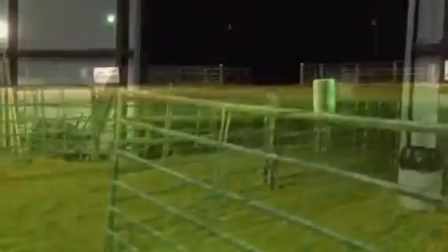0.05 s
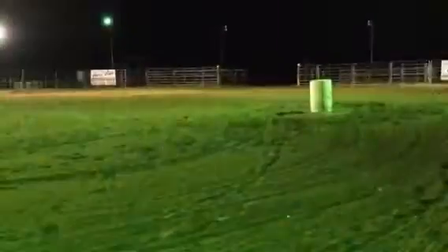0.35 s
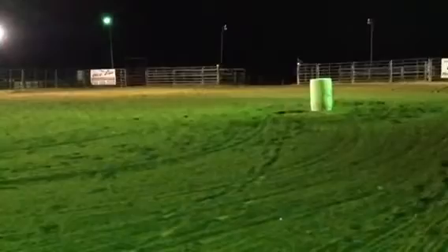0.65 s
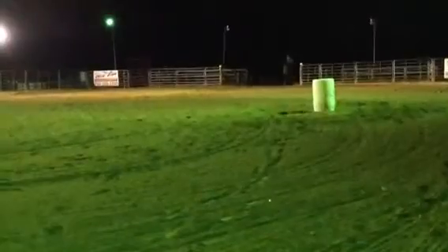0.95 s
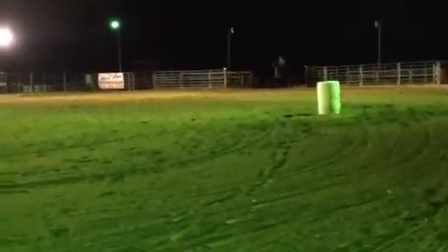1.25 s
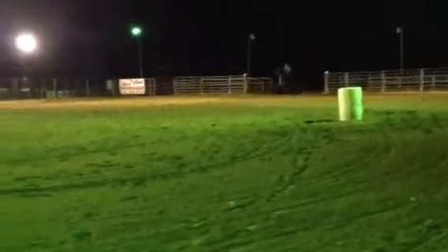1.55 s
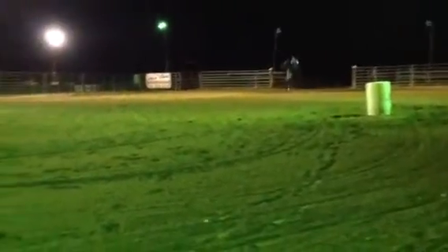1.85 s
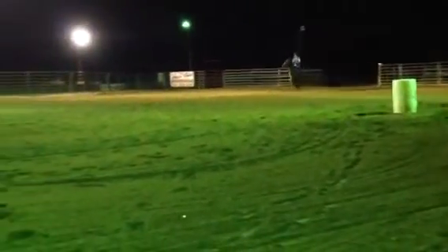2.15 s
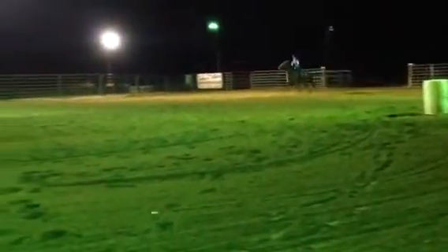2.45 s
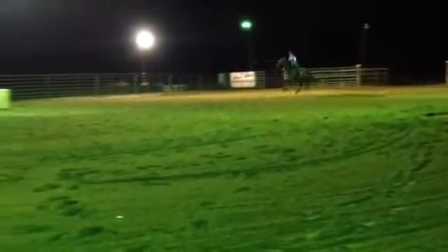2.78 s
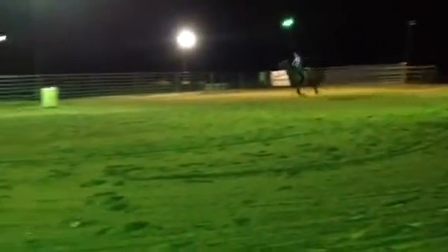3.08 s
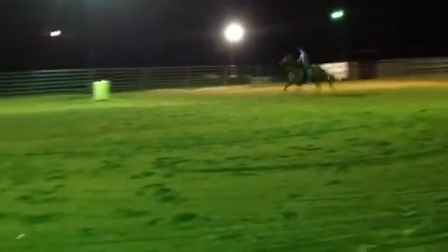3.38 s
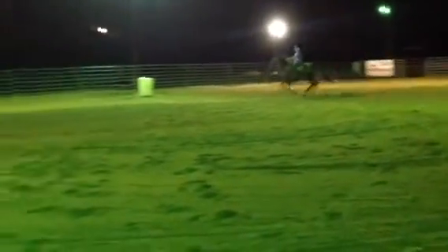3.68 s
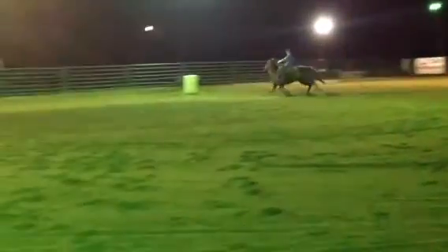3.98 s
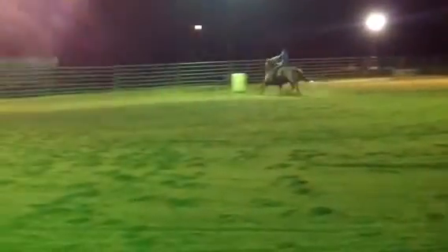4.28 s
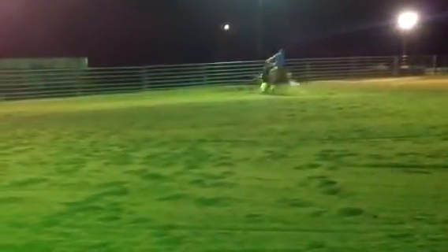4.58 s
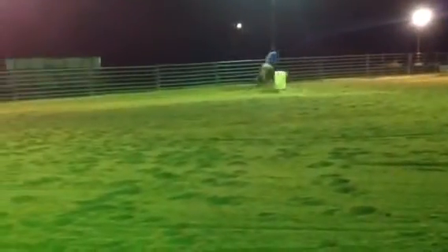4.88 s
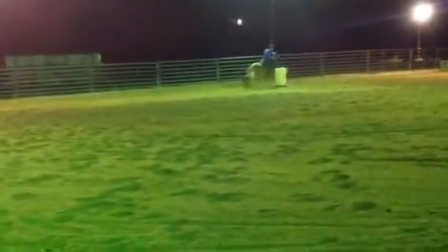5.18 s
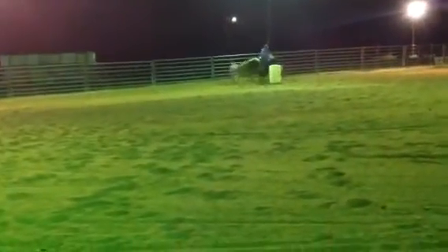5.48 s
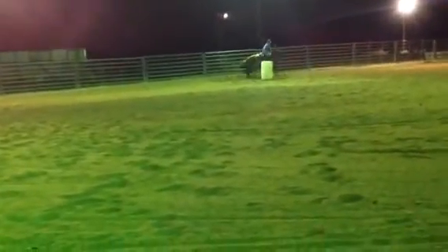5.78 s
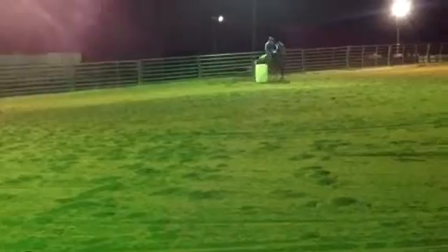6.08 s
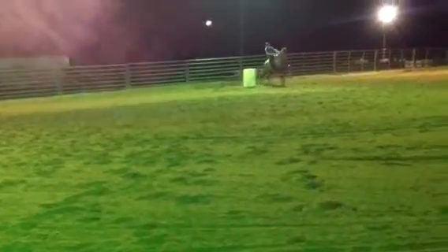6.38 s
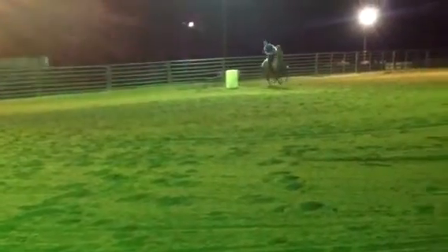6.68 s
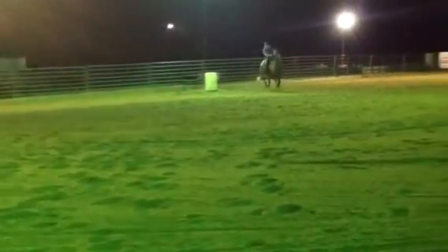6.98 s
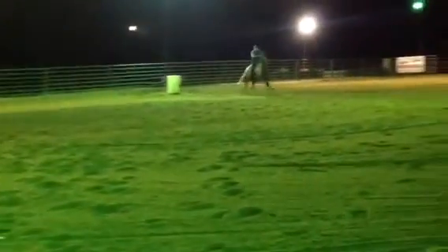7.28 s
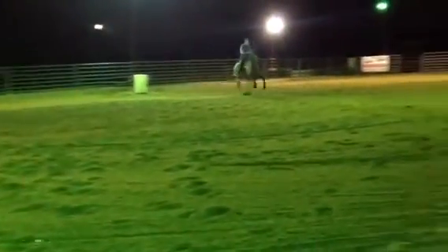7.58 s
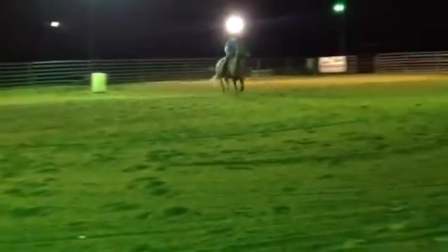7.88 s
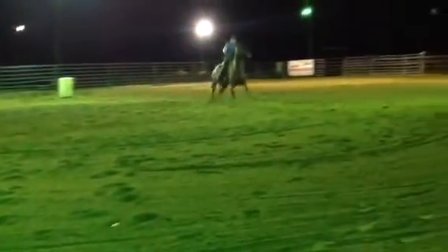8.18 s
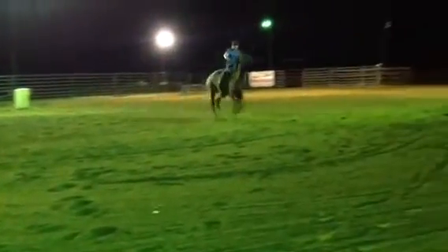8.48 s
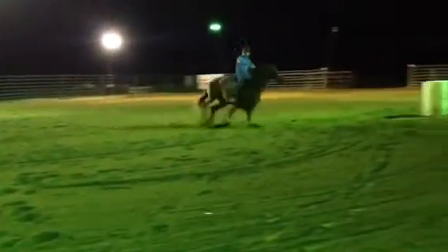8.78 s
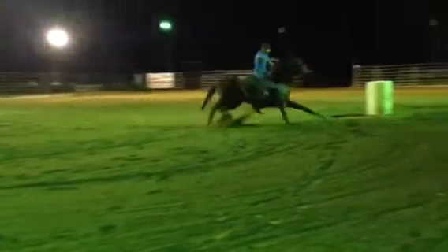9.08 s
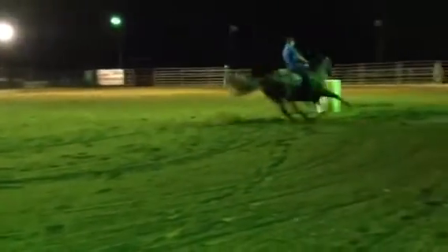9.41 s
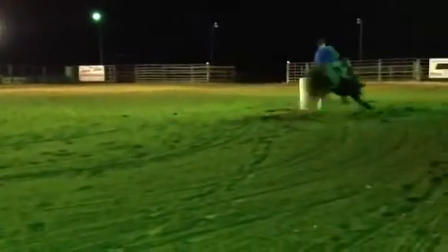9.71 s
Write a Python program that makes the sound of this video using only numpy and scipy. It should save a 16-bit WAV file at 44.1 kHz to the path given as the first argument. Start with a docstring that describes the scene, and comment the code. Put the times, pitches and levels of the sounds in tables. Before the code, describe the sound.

A horse gallops over soft dirt with thudding hooves, clinking tack and spraying sand, against a steady hiss of night insects.

```python
"""A horse gallops round a barrel on a dirt arena at night, heard from the rail.
Far insects hiss and nearer ones rasp their wings in turn; hooves thud, scuff and knock, dirt sprays.
At 1.4 s something hard clicks right beside the listener. From 2.2 s the metal of the tack clinks.
Near 6.2 s the horse treads softly round the barrel, then pounds out of the turn, flinging sand."""
import sys
import numpy as np
from scipy import signal
from scipy.fft import rfft, irfft
from scipy.io import wavfile
from scipy.ndimage import uniform_filter1d

SR = 44100
rng = np.random.default_rng(int(sys.argv[2]) if len(sys.argv) > 2 else 0)


def dump(signal):
    """Clip the signal to [-1, 1] and save it as 16-bit WAV at the path in sys.argv[1]."""
    limited = np.clip(np.atleast_2d(signal).T, -1, 1)
    pcm = np.round(limited * 32767).astype(np.int16)
    wavfile.write(sys.argv[1], SR, pcm)


N = 434385
T = np.arange(N) / SR

# hooves scraping through dirt: start_s, level_db, pitch_hz
HOOF_SCUFFS = [(.76, -43, 214), (2.974, -54, 398), (3.11, -55.5, 810), (4.015, -58, 900), (5.38, -55, 1000),
               (6.182, -53.5, 1190), (6.54, -55.5, 397), (6.669, -56, 1210), (6.935, -53, 1040),
               (7.135, -56.5, 1210), (7.372, -50.5, 1010), (7.805, -52, 890), (8.35, -54, 790),
               (8.725, -49, 970), (8.96, -53.5, 850), (9.089, -54.5, 900), (9.19, -49, 860),
               (9.421, -56, 890)]
# spectrum of crushed dirt: pitch_ratio, level_db
DIRT_COLOUR = [(.2, -12), (.35, -10), (.65, 5.5), (1, 6.5), (1.5, -1), (2.2, -4), (4.7, -10.5), (10, -43)]
# jolts of bit, chain and buckles: start_s, level_db, pitch_hz, relative_ring_db
TACK_CLINKS = [(2.233, -34, 8200, -20), (3.078, -25.5, 10400, -9), (3.435, -31, 8750, -2),
               (3.5405, -36, 9800, -10), (3.59, -27, 9170, 4), (3.688, -32, 10700, -14),
               (3.773, -31, 11700, -9), (4.061, -24, 9400, -9), (4.067, -30, 7300, -3),
               (4.082, -34, 10000, 0), (4.1565, -18.5, 11800, -19), (4.176, -28, 12500, 1),
               (4.19, -30, 13600, -2), (4.201, -32, 10200, -10), (4.5305, -34, 10400, -11),
               (4.881, -30, 12500, -17), (6.2643, -34, 11600, -9), (6.507, -27, 9700, -20),
               (6.6922, -23.5, 12800, -12), (7.021, -24.5, 12200, -20), (7.164, -30, 8850, 12),
               (7.522, -32, 11300, 0), (7.5224, -32, 6280, 5), (7.973, -33, 8970, -4),
               (8.09, -27.5, 11400, 2), (8.211, -24.5, 8940, -8), (8.213, -42, 13200, 4),
               (8.921, -26, 8900, 9), (8.927, -24, 8940, -2), (8.977, -26, 13000, -15),
               (9.071, -20.5, 11400, -25), (9.2175, -17, 11500, -18), (9.259, -23, 6500, -14),
               (9.2635, -28, 6940, -4), (9.34, -34, 8800, -20), (9.401, -21.5, 10700, -9),
               (9.431, -21, 9400, -9)]
# resonances of the tack: pitch_hz, level_db, t60_s
TACK_MODES = [(8850, -3, .06), (9900, -6, .05), (11270, -1, 0.059), (12460, 4, 0.044), (12970, -5, 0.05)]


def undb(db):
    """Decibels to gain."""
    return 10 ** (np.asarray(db) / 20)


def unit(x):
    """Scale to rms 1."""
    return x / np.sqrt(np.mean(x ** 2))


def unit_peak(x):
    """Scale to peak 1."""
    return x / np.abs(x).max()


def noise(size):
    """White noise."""
    return rng.standard_normal(size)


def add(out, start_s, x):
    """Mix x into out from start_s."""
    i = max(int(start_s * SR), 0)
    out[i:i + len(x)] += x[:N - i]


def highpass(x, hz):
    """Second-order low cut."""
    return signal.sosfilt(signal.butter(2, hz, "high", fs=SR, output="sos"), x)


def colour(x, points, pitch=1):
    """Filter by (frequency, dB) points, frequencies multiplied by pitch; rms 1."""
    hz, db = np.transpose(points)
    bins_hz = np.maximum(np.fft.rfftfreq(len(x), 1 / SR), 1)
    gain = undb(np.interp(np.log(bins_hz), np.log(hz * pitch), db))
    return unit(irfft(rfft(x) * gain, len(x)))


def band(x, hz, width_hz):
    """Steep resonance around hz; rms 1."""
    detune = (np.fft.rfftfreq(len(x), 1 / SR) - hz) / (width_hz / 2)
    return unit(irfft(rfft(x) / (1 + detune ** 4) ** .5, len(x)))


def walk(rate_hz):
    """Random held levels, smoothed twice; rms 1."""
    hold = int(SR / rate_hz)
    steps = np.repeat(noise(N // hold + 1), hold)
    return unit(uniform_filter1d(uniform_filter1d(steps, hold), hold)[:N])


def fade(t, t60_s):
    """Exponential decay, 60 dB in t60_s."""
    return np.exp(-np.log(1000) * t / max(t60_s, 1e-4))


def swell(t, peak_s, power):
    """Smooth rise to 1 at peak_s, then a longer fall."""
    u = t / max(peak_s, 1e-4)
    return (u * np.exp(1 - u)) ** power


def grains(size, per_s, spread_db):
    """Sparse impulses of uneven strength."""
    impulses = (rng.random(size) < per_s / SR) * noise(size)
    return impulses * undb(spread_db * rng.exponential(size=size).clip(0, 4))


def night():
    """Open air and a wavering chorus of far insects; both come up slightly at first."""
    # air spectrum: frequency_hz, level_db
    air_colour = [(18, -59), (30, -44), (95, -9), (160, 4.5), (290, -2), (415, -1.5), (988, -4), (1190, -8),
                  (1720, -9.5), (2290, 2), (2610, -4.5), (3870, -11.5), (4780, -4.5), (6720, -14.5),
                  (13700, -23.5), (14800, -21), (16000, -38)]
    # insect hiss: centre_hz, width_hz, level_db
    insect_bands = [(2355, 260, -64.5), (3160, 820, -57.5), (4840, 1570, -56.5)]
    # chorus contour: time_s, relative_db
    contour = [(0.0, -54), (1.15, -49), (2.14, -53), (2.6, -47.5), (3.68, -53), (4.77, -47.5),
               (5.21, -50.5), (9.85, -49)]
    air = undb(-53 + .4 * walk(7)) * colour(noise(N), air_colour)
    chorus = sum(undb(db + 1.14 * walk(8) + 1.2 * walk(30)) * band(noise(N), hz, width_hz)
                 for hz, width_hz, db in insect_bands)
    chorus *= unit(undb(np.interp(T, *np.transpose(contour))))
    return (air + chorus) * undb(np.interp(T, [0, .84], [-2, 0]))


def airborne_dirt(fling_db=-3, shake_db=-22):
    """Gain of the spray: a slow level that jumps after each scuff and each jolt of the tack."""
    # falling dirt, louder with the horse's speed and nearness: time_s, level_db
    contour = [(0.0, -71), (0.82, -64.5), (3.32, -61), (4.11, -51), (5.35, -58.5), (6.39, -55),
               (6.72, -63.5), (8.47, -54.5), (9.13, -47.5), (9.85, -53)]
    fling, shake, t = np.zeros(N), np.zeros(N), T[:SR // 2]
    for start_s, _, _ in HOOF_SCUFFS:
        add(fling, start_s, undb(fling_db) * swell(t, peak_s=.0074, power=.53))
    for start_s, db, _, _ in TACK_CLINKS:
        add(shake, start_s, undb(db + shake_db) * fade(t, t60_s=.071))
    slow_gain = undb(np.interp(T, *np.transpose(contour)))
    return np.hypot(slow_gain * (1 + fling), shake)


def spray(crackle_db=-2, jingle_db=-12):
    """Thrown sand falls in an uneven rush, crumbs tick in it and the tack stirs faintly."""
    # falling sand: frequency_hz, level_db
    sand_colour = [(1500, 1), (3500, -3), (6500, 0.5), (9000, 0), (13500, 2.5), (15500, -5)]
    flutter_db = 1.5 * walk(90) + 1.8 * walk(25) + 1.8 * walk(11)
    sand = undb(flutter_db) * colour(grains(N, per_s=8000, spread_db=1.3), sand_colour)
    landings, t = np.zeros(N), T[:SR // 8]
    gaps_s = rng.uniform(.003, .03, N // 100)
    landings[np.cumsum(gaps_s * SR).astype(int).clip(0, N - 1)] = 1
    crumb_envelope = signal.fftconvolve(landings * rng.random(N) ** 2, fade(t, t60_s=.0092))[:N]
    crackle = colour(crumb_envelope * noise(N), sand_colour)
    jingle = np.zeros(N)
    for hz, db, t60_s in TACK_MODES:
        ring = undb(db) * np.sin(2 * np.pi * hz * t) * fade(t, t60_s)
        jingle += signal.fftconvolve(grains(N, per_s=120, spread_db=3.6), ring)[:N]
    mix = sand + undb(crackle_db) * crackle + undb(jingle_db) * unit(jingle)
    return undb(-2.5) * airborne_dirt() * mix


def hoof(hz, peak_s=.0077, earth_db=-17, crumb_db=-24):
    """Soft soil takes a hoof gradually and swings unevenly; crumbs crush, loose earth settles."""
    t = T[:SR // 5]
    wobble_rad = .18 * band(noise(len(t)), hz / 2, width_hz=hz)
    load = swell(t, peak_s, power=4.8 * np.exp(rng.normal(0, .52)))
    blow = load * np.cos(2 * np.pi * hz * (t - peak_s) + rng.normal(0, .65) + wobble_rad)
    settling = fade(t, t60_s=.18) * np.minimum(t / peak_s, 1)
    earth = band(noise(len(t)), hz=270, width_hz=170) * settling
    crumbs = colour(grains(len(t), per_s=2500, spread_db=.8), DIRT_COLOUR, pitch=800)
    return blow + undb(earth_db) * earth + undb(crumb_db) * crumbs * swell(t, peak_s, power=1)


def patter(count=135, per_s=13, pitch_hz=209, turn_s=6.2, turn_sigma_s=.65, turn_db=-21):
    """Light footfalls, uneven in time, weight and pitch, softest in the turn."""
    out = np.zeros(N)
    for k, (late, weight, detune) in enumerate(noise((count, 3)).clip(-2, 2)):
        start_s = (k + .3 * late) / per_s % T[-1]
        in_turn = np.exp(-((start_s - turn_s) / turn_sigma_s) ** 2 / 2)
        db = -52 + 1.5 * weight + turn_db * in_turn
        add(out, start_s, undb(db) * hoof(pitch_hz * np.exp(.22 * detune)))
    return out


def chirp(length_s, hz, strokes_per_s=68, fall_hz=520, rasp_hz=1000):
    """A single call of rasping wings; each stroke slides down in pitch."""
    t = T[:int(length_s * SR)]
    stroke = (t * strokes_per_s + rng.random()) % 1
    pitch_hz = hz + fall_hz * (.5 - stroke) + rasp_hz * noise(len(t))
    gate = np.sin(np.pi * stroke) ** 2 * np.sin(np.pi * t / length_s) ** .5
    return unit(gate * np.sin(2 * np.pi * np.cumsum(pitch_hz) / SR))


def chirps(pitch_hz=7490, scatter_hz=90, faint_from_s=2.9, faint_db=-68, gap_s=.2):
    """Nearer insects rasp their wings in turn, carrying on more faintly later."""
    # near calls: start_s, level_db
    calls = [(.07, -62), (.48, -62), (.535, -62), (.83, -65), (1.145, -63), (1.235, -62), (1.475, -64),
             (1.83, -63.5), (2.36, -63), (2.49, -67), (2.68, -63)]
    out = np.zeros(N)
    for start_s, db in calls:
        add(out, start_s, undb(db) * chirp(length_s=.12, hz=rng.normal(pitch_hz, scatter_hz)))
    for slot_s in np.arange(faint_from_s, T[-1] - gap_s, gap_s):
        start_s = slot_s + .1 * rng.random()
        db = rng.normal(faint_db, 2)
        add(out, start_s, undb(db) * chirp(length_s=.09, hz=rng.normal(pitch_hz, scatter_hz)))
    return out


def ticks(sizzle_db=-17):
    """Grit strikes shoe or buckle: a short snap and a faint sizzle."""
    # grit on metal: start_s, peak_db, centre_hz
    strikes = [(0.254, -35, 11900), (2.945, -31, 12500), (2.979, -34, 12000), (3.1047, -34, 10000),
               (3.615, -32, 12100), (3.717, -31, 12800), (3.727, -31, 11000), (3.782, -29, 11500),
               (4.131, -31, 12800), (6.9501, -27.5, 12000), (7.1453, -26, 8000), (8.522, -29, 7640),
               (8.6562, -22.5, 6000), (8.949, -31, 8000), (9.0944, -32, 12400), (9.3418, -26, 7500),
               (9.427, -25, 9000), (9.432, -17.5, 8750), (9.6794, -27, 10100)]
    out, t = np.zeros(N), T[:SR // 25]
    envelope = fade(t, t60_s=.0025) + undb(sizzle_db) * fade(t, t60_s=.019)
    for start_s, db, hz in strikes:
        tick = band(noise(len(t)), hz, width_hz=7000) * envelope
        add(out, start_s, undb(db) * unit_peak(tick))
    return out


def thuds():
    """Heavy footfalls on soft soil."""
    # hoof landings: start_s, level_db, pitch_hz
    footfalls = [(0.665, -43, 222), (0.757, -45, 248), (0.782, -34, 244), (0.805, -38.5, 275),
                 (0.951, -40.5, 221), (1.144, -48, 226), (1.247, -36.5, 201), (1.534, -37, 211),
                 (1.588, -40, 226), (1.685, -43, 205), (1.992, -33.5, 187), (2.052, -38, 222),
                 (2.151, -41, 179), (2.381, -37, 208), (2.465, -39, 164), (3.01, -40, 196),
                 (3.423, -44, 202), (3.517, -39, 185), (3.7, -39.5, 259), (3.865, -46, 275),
                 (4.061, -43, 258), (4.155, -48, 240), (4.229, -43.5, 209), (4.322, -47, 195),
                 (4.611, -42, 250), (5.526, -40, 216), (7.142, -39.5, 215), (7.318, -32.5, 225),
                 (7.427, -38.5, 205), (7.656, -41.5, 173), (7.756, -40, 176), (7.851, -41, 242),
                 (8.051, -33.5, 202), (8.162, -34, 179), (8.2, -33.5, 182), (8.315, -40.5, 168),
                 (8.463, -45.5, 266), (8.618, -45, 199), (8.657, -38.5, 210), (8.976, -30.5, 222),
                 (9.007, -28.5, 173), (9.102, -39, 237), (9.411, -43.5, 286), (9.65, -30, 210)]
    out = np.zeros(N)
    for start_s, db, hz in footfalls:
        add(out, start_s, undb(db) * hoof(hz))
    return out


def scuffs(gain_db=1):
    """A sliding hoof crushes many crumbs of dirt in a short rush."""
    out, t = np.zeros(N), T[:SR // 4]
    for start_s, db, hz in HOOF_SCUFFS:
        crumbs = colour(grains(len(t), per_s=1800, spread_db=1.4), DIRT_COLOUR, hz)
        add(out, start_s, undb(db + gain_db) * swell(t, peak_s=.018, power=.48) * crumbs)
    return out


def knocks(gain_db=1):
    """Hoof on hoof or on a hard clod gives a woody tock; a breaking clod adds a dry crack."""
    # hard contacts: start_s, level_db, pitch_hz, relative_crack_db
    contacts = [(1.008, -39.5, 850, -15), (3.0155, -34, 680, -0.5), (3.521, -40, 517, -7),
                (4.06, -36.5, 850, -10), (4.162, -36, 1000, -5), (4.4795, -35, 850, -22),
                (4.488, -31, 880, -17), (4.812, -45, 750, -15), (5.047, -35, 530, -24),
                (7.147, -49.5, 1300, 11), (7.32, -41, 800, -15), (8.656, -37, 710, -10),
                (9.647, -36, 870, -16)]
    # tock spectrum: pitch_ratio, level_db
    tock_colour = [(.3, -23), (.55, -15), (.75, 5), (1.05, 10.5), (1.6, -4.5), (2.2, -20), (5, -26)]
    # crack spectrum: frequency_hz, level_db
    crack_colour = [(400, -11), (1500, 10), (2900, 4), (6000, -33)]
    out, t = np.zeros(N), T[:SR // 10]
    for start_s, db, hz, crack_db in contacts:
        tock = unit_peak(colour(noise(len(t)), tock_colour, hz) * fade(t, t60_s=.021))
        crack = unit_peak(colour(noise(len(t)), crack_colour) * fade(t, t60_s=.025))
        add(out, start_s, undb(db + gain_db) * (tock + undb(crack_db) * crack))
    return out


def click(start_s=1.3876, gain_db=-2.5, body_hz=275):
    """One hard tap close by: crack, knock, a low body that swings up late, rattle and rustle."""
    # resonances of the struck object: pitch_hz, level_db, t60_s
    modes = [(980, -4.5, 0.0075), (2740, -1, 0.0012), (4870, -7, 0.0013)]
    out, t = np.zeros(N), T[:SR // 2]
    crack = .53 * swell(t, peak_s=.00008, power=6.3)
    knock = sum(undb(db) * np.sin(2 * np.pi * hz * t) * fade(t, t60_s) for hz, db, t60_s in modes)
    body = undb(-24) * swell(t, peak_s=.0066, power=2.5) * np.sin(2 * np.pi * body_hz * t)
    grit = band(noise(len(t)), hz=6000, width_hz=8900)
    rattle = undb(-27) * fade(t, t60_s=.056) * grit
    rustle = undb(-47.5) * swell(t, peak_s=.049, power=1.9) * grit
    tap = highpass(crack + knock + rattle + rustle, hz=380)
    add(out, start_s, undb(gain_db) * (tap + body))
    return out


def clinks(gain_db=-1.5, width_hz=4600, rise_s=.00046, slide_s=.0012):
    """Links slide, then chatter, briefly if tight; a free one rings on and sets the tack ringing."""
    out, t = np.zeros(N), T[:SR // 6]
    before_s = T[:SR // 100][::-1]
    for start_s, db, hz, ring_db in TACK_CLINKS:
        chatter = band(noise(len(t)), hz, width_hz) * fade(t, t60_s=.017 * np.exp(ring_db / 30))
        roughness_rad = .12 * np.cumsum(noise(len(t)))
        link = np.sin(2 * np.pi * hz * t + roughness_rad)
        partials = sum(rng.random() * np.sin(2 * np.pi * rng.normal(mode_hz, 25) * t)
                       for mode_hz, _, _ in TACK_MODES)
        ring = (link + undb(-5) * partials) * fade(t, t60_s=.052)
        clink = unit_peak((chatter + undb(ring_db) * ring) * np.minimum(t / rise_s, 1))
        slide = undb(-20) * band(noise(len(before_s)), hz, width_hz) * np.exp(-before_s / slide_s)
        add(out, start_s - before_s[0], undb(db + gain_db) * np.concatenate([slide, clink]))
    return out


def kicks():
    """A hoof flings a fan of sand: a short scratchy rush of grains."""
    # fans of sand: start_s, level_db, rise_s, centre_hz
    fans = [(4.031, -35, 0.0025, 11000), (4.159, -36, 0.0023, 9350), (5.578, -38, 0.0057, 7140),
            (5.654, -40.5, 0.0017, 4450), (5.697, -48, 0.002, 4280), (5.986, -43.5, 0.0089, 9600),
            (6.975, -54, .004, 11000), (7.113, -52, .003, 10500), (8.856, -39, 0.0065, 8000),
            (8.951, -32.5, 0.002, 10000), (9.076, -46, .003, 11800), (9.263, -33, .002, 11500),
            (9.435, -40, 0.0029, 10500), (9.676, -45.5, 0.011, 11500)]
    out, t = np.zeros(N), T[:SR // 8]
    for start_s, db, rise_s, hz in fans:
        sand = highpass(grains(len(t), per_s=11000, spread_db=.53), hz=2500)
        add(out, start_s, undb(db) * swell(t, rise_s, power=.51) * band(sand, hz, width_hz=7000))
    return out


def scene():
    """Horse, dirt, insects and the click, in mono."""
    hooves = thuds() + patter() + scuffs() + knocks()
    metal = clinks() + ticks()
    dirt = kicks() + spray()
    return (hooves + metal + dirt + chirps() + click() + night())[None]


def record(dry, bass_hz=95, top_hz=15300):
    """Roll off the deep bass and cut the top steeply."""
    lowpass = signal.ellip(10, .2, 70, top_hz, fs=SR, output="sos")
    return signal.sosfilt(lowpass, highpass(dry, bass_hz))


dry = scene()
out = record(dry)
dump(out)
```